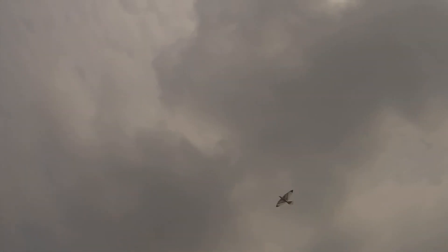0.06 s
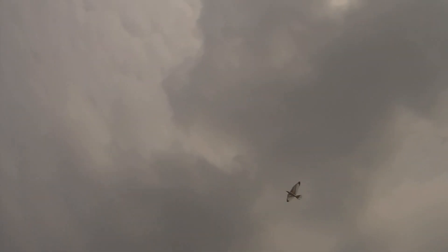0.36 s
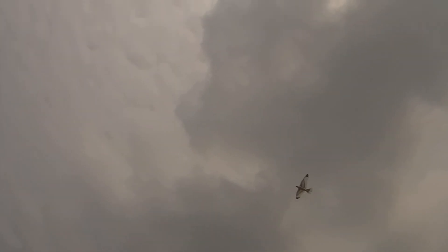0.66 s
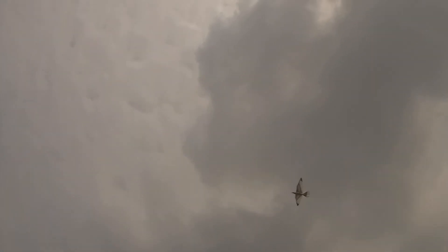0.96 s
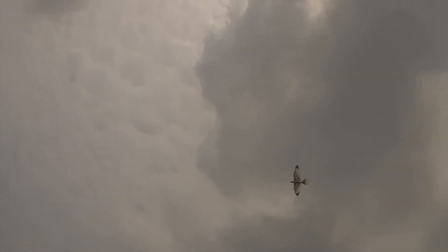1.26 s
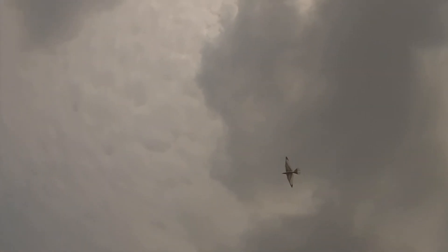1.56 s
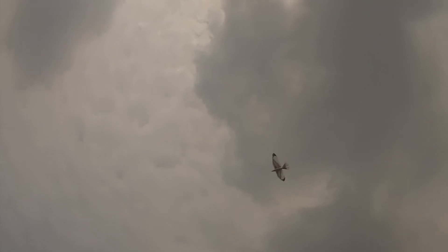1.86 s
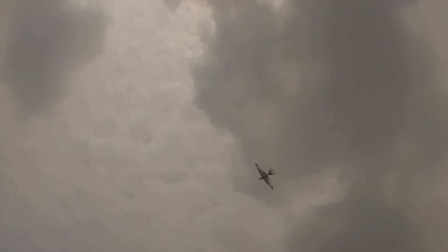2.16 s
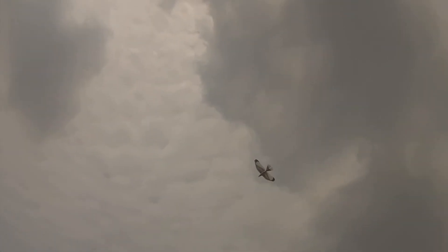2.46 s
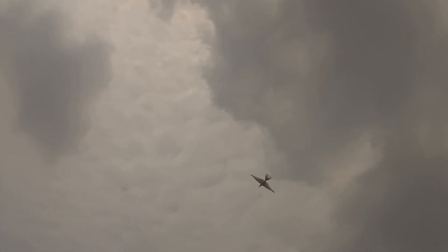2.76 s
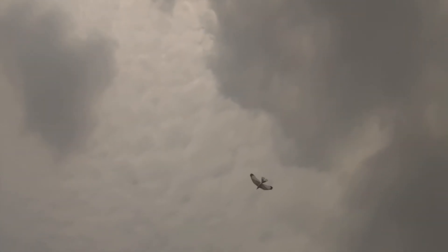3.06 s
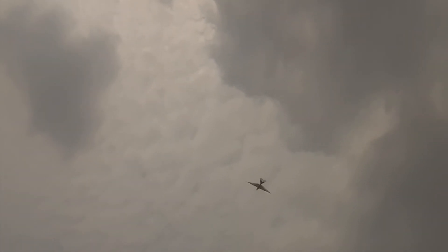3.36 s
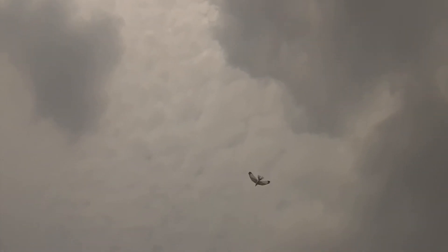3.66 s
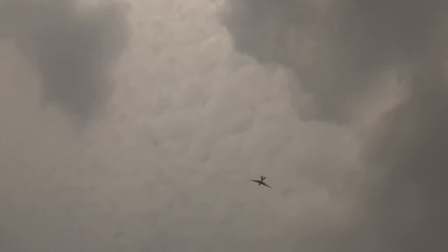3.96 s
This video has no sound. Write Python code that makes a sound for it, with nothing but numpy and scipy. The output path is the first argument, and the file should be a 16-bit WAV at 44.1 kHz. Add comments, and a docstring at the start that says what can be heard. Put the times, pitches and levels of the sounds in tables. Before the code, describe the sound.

Quick, even squeaks and gear whirring from a flapping mechanical bird, with wind rumble.

```python
"""Wind buffets the microphone, hard in the first second, over a faint outdoor hiss and two soft rustles.
Overhead a small motor-driven model bird flaps, five wingbeats a second.
Its gear train whines, sags in pitch under each stroke and squeaks where the load peaks.
The teeth rasp, the shaft buzzes, the wing linkage scrapes and the ground echoes it all."""
import sys
import numpy as np
from scipy import signal
from scipy.fft import rfft, irfft
from scipy.io import wavfile
from scipy.ndimage import map_coordinates

SR = 44100
rng = np.random.default_rng(int(sys.argv[2]) if len(sys.argv) > 2 else 0)


def wrap_up_sound(samples):
    """Save the sound to the file named by the first command line argument, as 16-bit audio."""
    columns = np.atleast_2d(samples).T
    # keep every value between -1 and 1, then stretch to whole-number steps
    tamed = np.clip(columns, -1, 1)
    steps = np.round(tamed * 32767).astype(np.int16)
    wavfile.write(sys.argv[1], SR, steps)


N = 176400
TIME_S = np.arange(N) / SR
BIN_HZ = np.fft.rfftfreq(N, 1 / SR)
PINION_TEETH = 14


def amp(db):
    """Decibels to gain."""
    return 10 ** (np.asarray(db) / 20)


def unit(x):
    """Scales to rms 1."""
    return x / np.sqrt(np.mean(x ** 2) + 1e-20)


def colour(x, spectrum):
    """Filters x by a curve of (Hz, dB) points, to rms 1."""
    hz, db = np.transpose(spectrum)
    gain = amp(np.interp(np.log(BIN_HZ + 1), np.log(hz), db))
    return unit(irfft(rfft(x) * gain, N))


def noise(spectrum):
    """Coloured noise, rms 1."""
    return colour(rng.standard_normal(N), spectrum)


def wander(rate_hz):
    """Smooth random motion up to rate_hz, rms 1."""
    return unit(irfft(rfft(rng.standard_normal(N)) / (1 + (BIN_HZ / rate_hz) ** 4), N))


def curves(rows):
    """Interpolates each column linearly over the times in the first."""
    times_s, *columns = np.transpose(rows)
    return [np.interp(TIME_S, times_s, column) for column in columns]


def swell(centre_s, half_width_s):
    """Gaussian envelope, peak 1."""
    return np.exp(-np.minimum(((TIME_S - centre_s) / half_width_s) ** 2, 20))


# Each row: frequency in Hz, relative density in dB.
AIR_SPECTRUM = [(60, 18), (500, -5), (1100, 5), (1650, -23), (2100, 0), (2900, -12.5), (4500, -55),
                (6200, -20.5), (9300, -13), (12000, -32), (15000, -29)]


def air(level_db=-46.5):
    """Steady outdoor hiss."""
    return amp(level_db) * noise(AIR_SPECTRUM)


# Each row: centre in seconds, half width in seconds, level in dB.
RUSTLES = [(.79, .014, -53), (1.205, .018, -54)]
# Each row: frequency in Hz, relative density in dB.
RUSTLE_SPECTRUM = [(1000, -21), (2000, 10), (3100, 7), (5000, -26)]


def rustles():
    """Two short, soft swells of noise."""
    envelope = sum(amp(db) * swell(centre_s, half_s) for centre_s, half_s, db in RUSTLES)
    return envelope * noise(RUSTLE_SPECTRUM)


# Each row: time in seconds, rumble gain in dB, flutter gain in dB.
GUSTS = [(0, -10, -8.5), (.04, -18, -16), (.11, -26, -18.5), (.23, -21.5, -21.5), (.26, -17.5, -14.5),
         (.34, -20.5, -13.5), (.41, -21, -17.5), (.52, -18.5, -18), (.555, -23, -32), (.61, -22, -15.5),
         (.67, -24.5, -20.5), (.84, -23, -16), (.93, -29.5, -32.5), (1.03, -30.5, -30.5),
         (1.14, -36, -43.5), (1.33, -38.5, -40.5), (1.5, -27, -34), (1.74, -22, -28.5), (1.92, -27, -31),
         (2.02, -31.5, -40.5), (2.28, -32, -38.5), (2.5, -34, -41.5), (2.75, -32.5, -46),
         (3.05, -33, -36.5), (3.65, -30, -32.5), (4, -32, -34.5)]
# Each row, in all three: frequency in Hz, relative density in dB.
RUMBLE_SPECTRUM = [(10, -12), (25, -5.5), (45, 0), (70, 1), (105, 1.5), (150, -7), (250, -32.5), (800, -77),
                   (8000, -125)]
FLUTTER_SPECTRUM = [(70, -30), (120, -3), (165, 3), (260, -6), (400, -15.5), (600, -31), (1000, -38),
                    (2000, -49), (12000, -120)]
PUFF_SPECTRUM = [(70, -11), (130, -0.5), (190, 1), (340, -2), (600, -13), (900, -23.5), (1300, -37.5),
                 (2000, -44.5), (4000, -53), (12000, -108)]


def wind(puff_onset_db=-29, puff_full_db=-13.5, puff_depth_db=6.5, eddy_depth_db=1.8):
    """Wind on the microphone: rumble, and flutter that breaks into brighter puffs as the gust grows."""
    rumble_db, flutter_db = curves(GUSTS)
    puff_share = np.clip((flutter_db - puff_onset_db) / (puff_full_db - puff_onset_db), 0, 1)
    turbulence = rng.standard_normal(N) * amp(puff_depth_db * np.tanh(wander(rate_hz=131)))
    puffs = colour(turbulence, PUFF_SPECTRUM)
    flutter = np.sqrt(1 - puff_share) * noise(FLUTTER_SPECTRUM) + np.sqrt(puff_share) * puffs
    eddies = amp(eddy_depth_db * wander(rate_hz=45))
    return eddies * (amp(rumble_db) * noise(RUMBLE_SPECTRUM) + amp(flutter_db + 0.5) * flutter)


# Each row: start in seconds, decay time in seconds, level in dB.
BUFFETS = [(0.027, 0.0088, -9), (0.054, 0.017, -12), (0.218, 0.0041, -19), (0.254, 0.0031, -8),
           (0.278, 0.0093, -13.5), (0.306, 0.012, -10.5), (0.35, 0.011, -16), (.369, 0.007, -7),
           (0.382, 0.0029, -8.5), (.458, 0.0048, -8), (0.6, 0.0043, -20), (.62, 0.0046, -15),
           (0.816, 0.016, -20)]
# Each row: frequency in Hz, relative density in dB.
BUFFET_SPECTRUM = [(80, -6), (250, 3.5), (500, 7), (800, -1), (1300, -14), (2000, -31), (3500, -76),
                   (7000, -72), (14000, -100)]


def buffets(rise_s=0.00086):
    """Sharp hits of wind on the microphone: quick rise, exponential decay."""
    envelope = np.zeros(N)
    for start_s, decay_s, db in BUFFETS:
        age_s = np.maximum(TIME_S - start_s, 0)
        envelope += amp(db) * np.minimum(age_s / rise_s, 1) * np.exp(-np.minimum(age_s / decay_s, 20))
    return envelope * noise(BUFFET_SPECTRUM)


# Each row: time in seconds, echo delay in ms, rasp gain in dB, treble gain in dB, body ring in dB.
FLIGHT = [(0, 7.2, -1.5, 3.5, -23), (.5, 7.1, -5, 5, -11), (1, 8.2, 0.5, 1, -14), (1.5, 9.5, 1, -2.5, -21),
          (2, 8.5, 1, 0, -18.5), (2.5, 8.78, -0.5, 4, -11), (3.2, 8.35, 0, -1, -12),
          (4, 7.94, -2, -0.5, -9)]


def ground_echo(direct, gain_db=-11):
    """One reflection off the ground; its delay follows the bird's height."""
    delay_ms = curves(FLIGHT)[0]
    source_sample = (TIME_S - delay_ms / 1000) * SR
    return amp(gain_db) * map_coordinates(direct, [source_sample], order=3)


# Each row: offset from peak load in seconds, half width in seconds, level in dB.
SCRAPES = [(-.003, 0.0036, -47), (0.022, .004, -55), (0.095, 0.0053, -51.5)]
# Each row: frequency in Hz, relative density in dB.
SCRAPE_SPECTRUM = [(2500, -19), (4700, 4.5), (6300, -6), (10800, -6), (12500, -26), (15000, -23)]


def linkage_scrapes(beats_s, tooth_phase, spread_db=2):
    """The wing linkage scrapes at the same points of every beat, chattering with the pinion."""
    _, flight_db, treble_db, _ = curves(FLIGHT)
    strengths = amp(spread_db * rng.standard_normal((len(beats_s), len(SCRAPES))))
    contact = sum(amp(db) * strength @ swell(beats_s[:, None] + offset_s, half_s)
                  for (offset_s, half_s, db), strength in zip(SCRAPES, strengths.T))
    chatter = unit(1 + 0.5 * np.cos(tooth_phase / PINION_TEETH))
    return amp(flight_db + treble_db / 2) * contact * chatter * noise(SCRAPE_SPECTRUM)


# Each row: multiple of the shaft rate, boost over the other orders in dB.
SHAFT_ORDERS = [(4, 11), (5, 11.5), (7, 6), (15, 14), (16, 13.5), (17, 11), (18, 15), (31, 15)]


def shaft_buzz(tooth_phase):
    """Harmonics of the motor shaft, skipping those of the tooth rate; rms 1."""
    boost_db = dict(SHAFT_ORDERS)
    buzz = np.zeros(N)
    for order in range(1, 3 * PINION_TEETH):
        if order % PINION_TEETH:
            offset_rad = 2 * np.pi * rng.random() + 0.5 * wander(rate_hz=38)
            buzz += amp(boost_db.get(order, 0)) * np.cos(order * tooth_phase / PINION_TEETH + offset_rad)
    return unit(buzz)


# Each row: frequency in Hz, relative gain in dB.
RASP_SPECTRUM = [(300, 5.5), (700, 6), (1100, 4), (1650, -3.5), (2000, -8), (2850, -10), (3500, -1),
                 (4500, -3.5), (5300, -7.5), (6000, -10.5), (7500, -12), (9300, -19.5), (10800, -17),
                 (12200, -24.5), (15000, -36)]


def gear_rasp(tooth_phase, grit_db=1.5, buzz_db=-7.5, treble_hz=5540, body_hz=1950, body_width_hz=200):
    """Tooth noise and shaft buzz, coloured by the hollow body and by the way the bird faces."""
    _, flight_db, treble_db, body_db = curves(FLIGHT)
    grit = unit(rng.standard_normal(N) * amp(grit_db * wander(rate_hz=533)))
    rasp = colour(grit + amp(buzz_db) * shaft_buzz(tooth_phase), RASP_SPECTRUM)
    treble = signal.sosfiltfilt(signal.butter(3, treble_hz, "high", fs=SR, output="sos"), rasp)
    body = unit(signal.lfilter(*signal.iirpeak(body_hz, body_hz / body_width_hz, SR), rasp))
    return amp(flight_db) * (rasp + (amp(treble_db) - 1) * treble + amp(body_db) * body)


# Each row: peak load time in seconds, then squeak levels in dB: as the stroke bites, under load,
# at the octave, on the return stroke.
WINGBEATS = [(0.142, -41, -46.5, -52, -38.5), (0.344, -37, -45, -41, -39), (0.544, -35.5, -47, -41, -39),
             (0.745, -36.5, -44, -61, -40), (0.946, -35.5, -41, -59, -45), (1.147, -36, -42, -47, -44),
             (1.348, -37, -46, -39, -45), (1.55, -37.5, -47.5, -38, -42.5), (1.752, -37.5, -49, -45, -42),
             (1.954, -40, -49, -50, -42.5), (2.156, -36.5, -55, -38, -41.5), (2.358, -42, -47, -37, -42.5),
             (2.561, -40, -47.5, -41, -45), (2.762, -37.5, -48, -44, -44), (2.965, -39, -48.5, -41.5, -47),
             (3.168, -33, -48, -43, -55), (3.371, -32, -46.5, -47, -47.5), (3.572, -33, -46.5, -50, -49),
             (3.775, -36.5, -43, -52, -49), (3.977, -37.5, -44, -55, -55)]
# Those four squeaks. Each row: offset from peak load in seconds, half width in seconds, gain in dB.
SQUEAKS = [(-.025, 0.0068, -5.5), (-.008, 0.0083, 2.5), (-.004, 0.0047, -2.5), (0.102, 0.0051, -2)]


def squeak_envelopes(whine_db, octave_db, hold_s=0.027):
    """Gains of the whine and its octave: short peaks, with the teeth sticking for hold_s around them."""
    beats_s, bite_db, load_db, high_db, return_db = np.transpose(WINGBEATS)
    bite, load, high, back = [amp(db) * swell(beats_s[:, None] + offset_s, half_s)
                              for offset_s, half_s, db in SQUEAKS]
    bite_s, load_s, _, return_s = np.array(SQUEAKS)[:, 0]
    knots_s = np.r_[bite_s - hold_s, bite_s, load_s, load_s + hold_s,
                    return_s - hold_s, return_s + hold_s]
    knots_db = np.c_[bite_db, bite_db, load_db, load_db, return_db, return_db]
    stick_db = np.interp(TIME_S, (beats_s[:, None] + knots_s).ravel(), knots_db.ravel())
    fundamental = amp(stick_db) * np.hypot(amp(whine_db), (bite + load + back).sum(0))
    octave = np.hypot(amp(octave_db), amp(high_db) @ high)
    return fundamental, octave


def gear_whine(beats_s, tooth_phase, whine_db, octave_db, third_db=-60.5, creak_db=-19, flicker_db=3.5):
    """Three harmonics of the meshing teeth, the third only near peak load, and a faint creaking tone."""
    fundamental, octave = squeak_envelopes(whine_db, octave_db)
    third = amp(third_db) * swell(beats_s[:, None] - 0.0058, half_width_s=0.014).sum(0)
    roughness_rad = 0.55 * swell(centre_s=2.4, half_width_s=0.55)
    whine = np.zeros(N)
    for harmonic, envelope in enumerate([fundamental, octave, third], 1):
        flicker = amp(flicker_db * (wander(rate_hz=110) - 0.56))
        whine += envelope * flicker * np.sin(harmonic * tooth_phase + roughness_rad * wander(rate_hz=296))
    creak_gain = fundamental * amp(creak_db + flicker_db * wander(rate_hz=110))
    creak = creak_gain * np.sin(18 * tooth_phase / PINION_TEETH)  # 18th shaft order
    return np.sqrt(2) * (whine + creak)


# One wingbeat. Each row: offset from peak load in seconds, tooth rate in Hz,
# whine in dB relative to the squeaks, octave level in dB, rasp level in dB.
LOAD_CYCLE = [(-.062, 4160, -50, -70.5, -47), (-.053, 4470, -36, -64, -54.5),
              (-.046, 4350, -17, -67.5, -42.5), (-.033, 4260, -14.5, -54, -46),
              (-.018, 3900, -7, -54, -44.5), (-.003, 3710, 1, -57.5, -43), (.012, 3870, -3.5, -54, -43),
              (.034, 4064, -19, -62.5, -46), (.051, 4240, -43, -69, -52), (.068, 4395, -12, -64, -43),
              (0.087, 4329, -5, -59.5, -48.5), (.1, 4226, -4.5, -58, -45), (.123, 4174, -18, -58, -48.5)]


def model_bird(jitter=0.00754, drift=0.003256):
    """The gear train drives the wings; its speed, whine, rasp and scrapes follow each beat's load."""
    beats_s = np.array(WINGBEATS)[:, 0]
    beats_s = np.r_[2 * beats_s[0] - beats_s[1], beats_s]  # already flapping at time zero
    cycles = [(beat_s + offset_s, *values) for beat_s in beats_s for offset_s, *values in LOAD_CYCLE]
    tooth_hz, whine_db, octave_db, rasp_db = curves(cycles)
    speed_ratio = 1 + jitter * wander(rate_hz=296) + drift * wander(rate_hz=8.8)
    tooth_phase = 2 * np.pi * np.cumsum(tooth_hz * speed_ratio) / SR
    whine = gear_whine(beats_s, tooth_phase, whine_db, octave_db)
    return whine + amp(rasp_db) * gear_rasp(tooth_phase) + linkage_scrapes(beats_s, tooth_phase)


def scene(fade_in_s=0.004):
    """Mono mix of bird, echo, wind, rustles and air."""
    bird = model_bird()
    mix = bird + ground_echo(bird) + wind() + buffets() + rustles() + air()
    fade = np.sin(np.pi / 2 * np.minimum(TIME_S / fade_in_s, 1)) ** 2
    return (fade * mix)[None]


def record(dry, cutoff_hz=15250):
    """Soft-clips the strongest buffets, then low-passes."""
    rounded = dry / (1 + dry ** 4) ** 0.25
    lowpass = signal.firwin(511, cutoff_hz, window=("kaiser", 9), fs=SR)
    return signal.oaconvolve(rounded, lowpass[None], "same")


dry = scene()
out = record(dry)
wrap_up_sound(out)
```